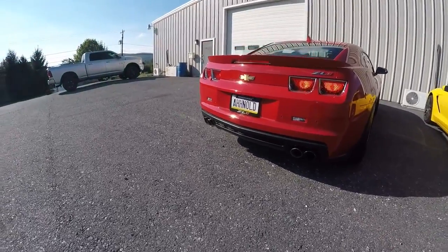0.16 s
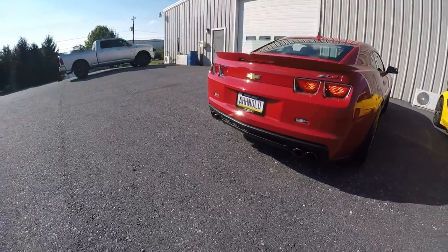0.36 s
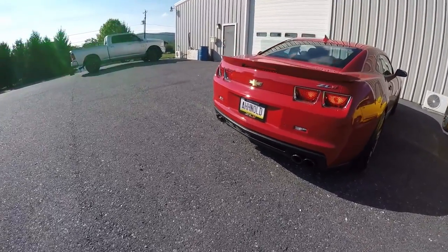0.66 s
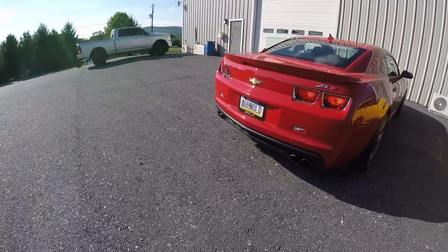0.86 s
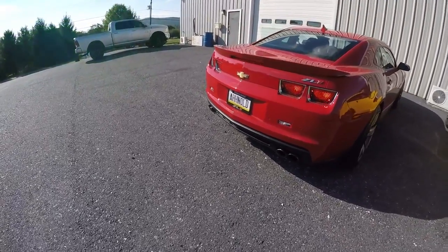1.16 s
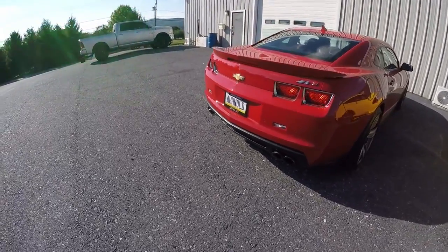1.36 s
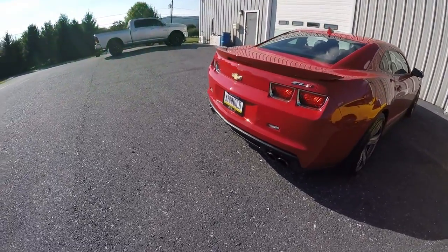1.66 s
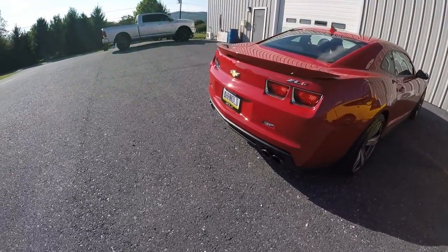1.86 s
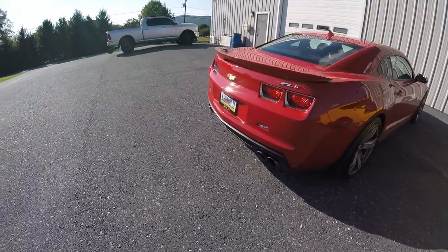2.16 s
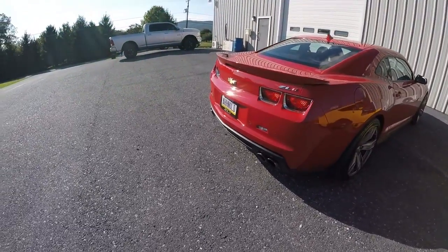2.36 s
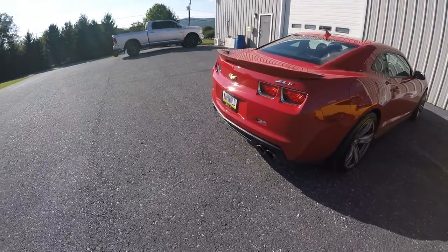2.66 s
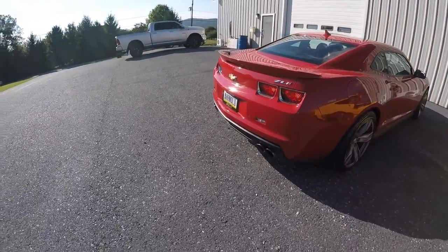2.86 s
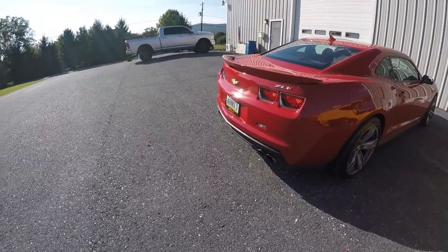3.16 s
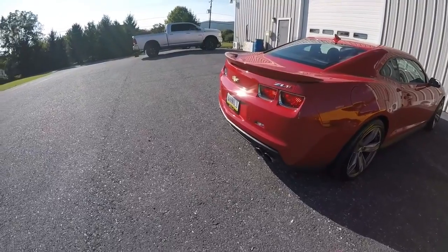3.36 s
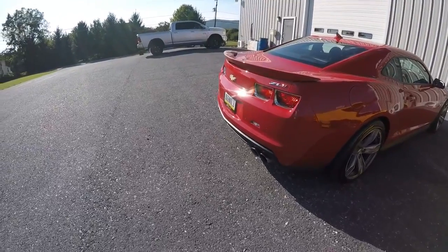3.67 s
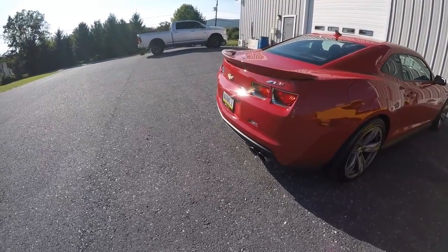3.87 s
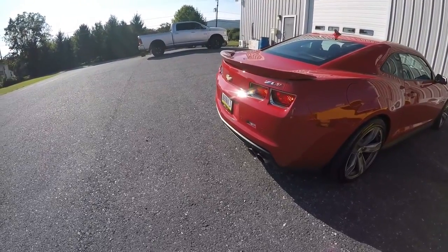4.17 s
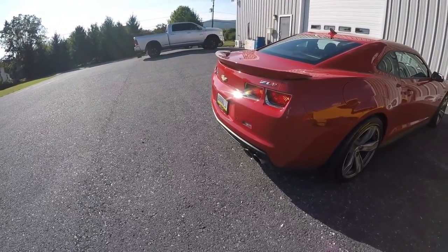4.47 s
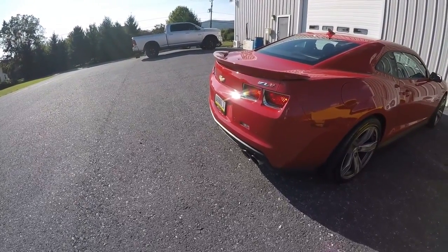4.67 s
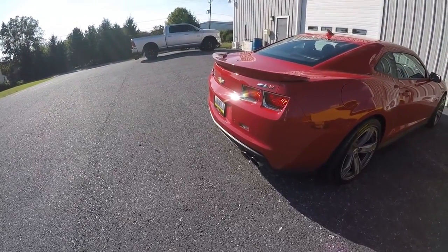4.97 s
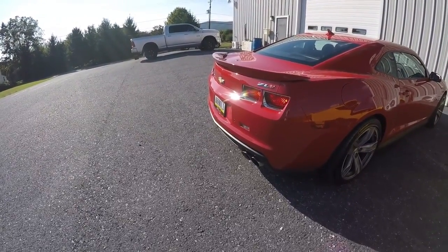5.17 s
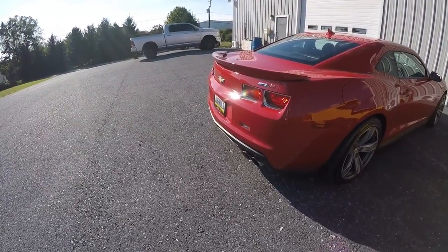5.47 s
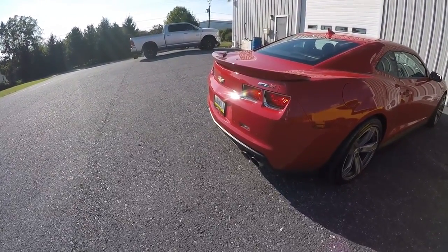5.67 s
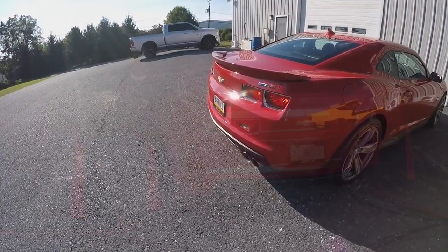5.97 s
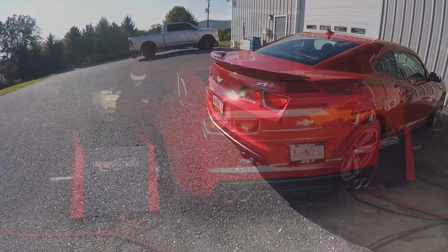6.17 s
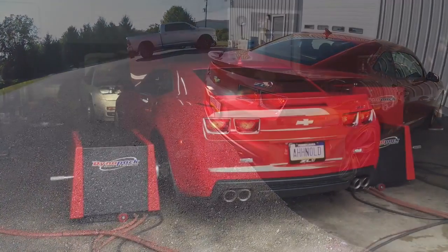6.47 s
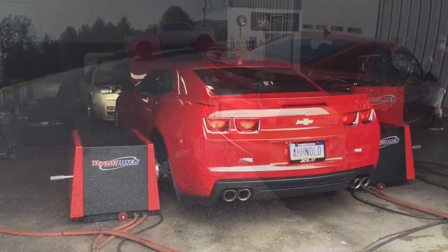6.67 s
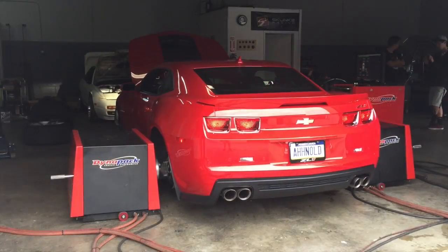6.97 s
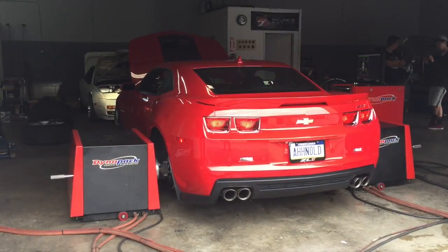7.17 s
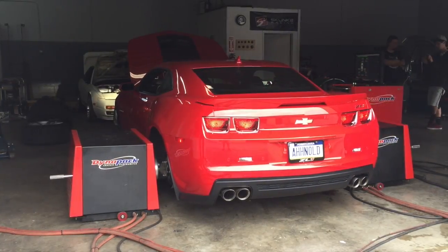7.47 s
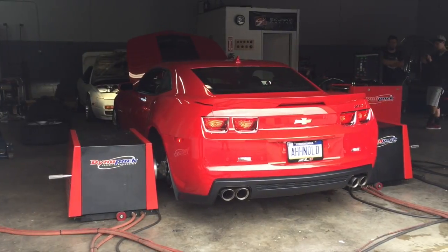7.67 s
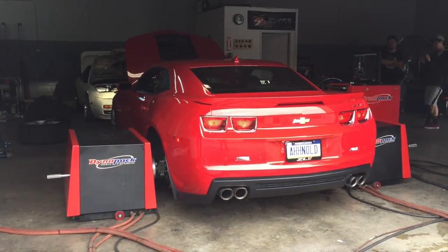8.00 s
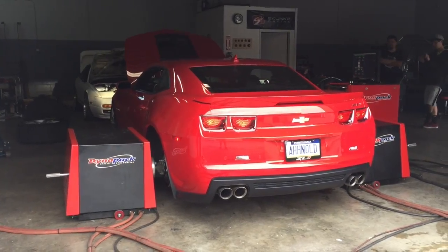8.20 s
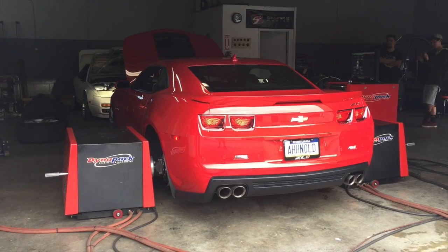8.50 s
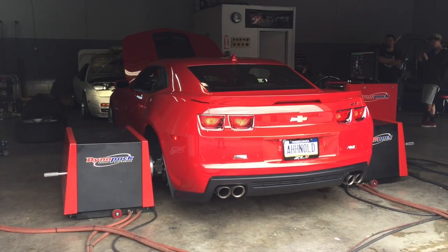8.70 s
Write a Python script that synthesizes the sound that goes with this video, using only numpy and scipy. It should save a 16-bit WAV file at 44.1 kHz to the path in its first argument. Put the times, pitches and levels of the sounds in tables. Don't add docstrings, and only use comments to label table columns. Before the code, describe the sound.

From 0 to 0.8 s a just-started cold V8 shakes outdoors, close to the microphone: sharp metallic ticks, heavy dull body knocks in the first quarter second, low yard rumble and a loping fast idle. The firing rate falls quickly until about 1.7 s, crossing hollow pipe notes, then eases by 3 s into a deep throb of roughly fifty pulses a second, with uneven silencer knocks. The exhaust is duller at first; from 1.2 to 3.4 s it grows louder and brighter as the listener walks behind the tailpipes, with gritty rasp and spitting, fizzing gas. It idles steadily until a crossfade at 6.1-6.8 s. In a resonant workshop, a thick low engine drone holds, begins climbing around 7 s, and rises faster after 8 s, swelling through booming resonances with pulsing roar and crackle. Pitch peaks near 8.7 s, then dips at the end.

```python
import sys
import numpy as np
from scipy import signal
from scipy.fft import rfft, irfft, next_fast_len
from scipy.io import wavfile
from scipy.ndimage import uniform_filter1d, map_coordinates

SR = 44100
rng = np.random.default_rng(int(sys.argv[2]) if len(sys.argv) > 2 else 0)


def transcribe(u):
    v = np.clip(np.atleast_2d(u).T, -1, 1)
    q = np.round(v * 32767).astype(np.int16)
    wavfile.write(sys.argv[1], SR, q)


def nominal_scale(level):
    x = np.asarray(level, float) / 20
    return 10 ** x


N = 389844
T = np.arange(N) / SR

# throb_db, throb_late_firings, spit_db
CYLINDERS = [(-1, 0.034, 0.5), (-1.5, -0.051, 0.5), (-0.5, -0.075, -5), (0, -0.067, 1.5),
             (-0.5, -0.005, -3), (1, 0.041, -2), (-4, -0.00025, 1.5), (1.5, -0.081, -2)]
FULL_BEAM_DB = -32


def unit(x):
    return x / np.sqrt(np.mean(x ** 2) + 1e-20)


def curves(rows):
    s, *cols = np.transpose(rows)
    return [np.interp(T, s, c) for c in cols]


def ramp(start_s, length_s):
    return np.clip((T - start_s) / length_s, 0, 1)


def wobble(rate_hz):
    return map_coordinates(rng.standard_normal(int(N * rate_hz / SR) + 4), [T * rate_hz])


def noise():
    return rng.standard_normal(N)


def filtered(x, response):
    m = next_fast_len(N + SR // 2)
    return irfft(rfft(x, m) * response(np.fft.rfftfreq(m, 1 / SR)), m)[:N]


def colour(points):
    f, db = np.transpose(points)
    return lambda hz: nominal_scale(np.interp(np.log(hz + 1), np.log(f + 1), db))


def resonant(modes):
    return lambda f: sum((-1) ** k * nominal_scale(db) * 1j * f * w / (c * c - f * f + 1j * f * w)
                         for k, (c, w, db) in enumerate(modes))


def lifted(modes, hz):
    return nominal_scale(sum(db / (1 + (2 * (hz - c) / w) ** 2) for c, w, db in modes))


def steep(hz, width_hz, db):
    return lambda f: nominal_scale(db) * resonant([(hz, 1.25 * width_hz, 0)])(f) ** 2


def idle():
    # start_s, firings_per_s
    idle_speed = [(0.0, 95.0), (0.6, 81.76), (0.85, 73.58), (1.1, 65.59), (1.4, 60.78), (1.7, 58.98),
                  (2.0, 57.43), (2.3, 53.78), (2.7, 52.96), (3.1, 51.69), (3.6, 51.79), (4.1, 51.8),
                  (4.6, 52.15), (5.05, 50.87), (5.4, 51.97), (5.8, 50.71), (6.1, 50.45), (6.6, 49.36)]
    # start_s, gas_spit_db
    beam_walk = [
        (0, -46),
        (.3, -50.5),
        (.95, -50.5),
        (1.25, -45.5),
        (1.5, -40.5),
        (2.3, -38.5),
        (2.9, -34.5),
        (3.4, -32),
        (6.3, -32.5),
    ]
    speed, = curves(idle_speed)
    spit_db, = curves(beam_walk)
    swing_db = spit_db - FULL_BEAM_DB
    full_knock_db, knock_follows, aside_knock_db = -24, 0.94, -36.5
    knock_db = 20 * np.log10(np.hypot(nominal_scale(full_knock_db + knock_follows * swing_db), nominal_scale(aside_knock_db)))
    rasp_db = -28.5 + 0.87 * swing_db

    first_firing = .235
    turns = first_firing + np.cumsum(speed) / SR
    firing = np.arange(int(turns[-1]) + 2)
    shared_db = 1.2 * rng.standard_normal(len(firing))
    blows = header_blows(turns, firing)

    engine = throb(speed, turns, firing) + cold_pipes(blows)
    engine += nominal_scale(knock_db) * silencer_knock(blows)
    engine += nominal_scale(rasp_db) * pipe_rasp(blows, turns, shared_db)
    engine += gas_spit(spit_db, turns, shared_db)
    return engine + yard(knock_db)


def throb(speed, turns, firing):
    boom_hz, boom_width_hz, boom_db = 55.65, 9.5, -11
    throb_db = boom_db - 10 * np.log10(1 + ((speed - boom_hz) / boom_width_hz) ** 2)
    size_db, late, _ = np.transpose(CYLINDERS)[:, firing % len(CYLINDERS)]
    size_db = size_db + 0.89 * rng.standard_normal(len(firing))
    late = late + 0.0085 * rng.standard_normal(len(firing))
    angle = 2 * np.pi * (turns - map_coordinates(late, [turns]))
    regular = unit(nominal_scale(map_coordinates(size_db, [turns])) * np.cos(angle))
    warm = ramp(.3, 0.69)

    lope_from_s, lope_to_s, rise_db_per_s, fall_db_per_s = 0.25, .82, 25, 52
    lope_db = -24 - rise_db_per_s * (lope_from_s - T).clip(0) - fall_db_per_s * (T - lope_to_s).clip(0)
    lope_hz = np.minimum(speed * 3 / 4, 62.9)
    lope = nominal_scale(lope_db + 2 * wobble(15)) * np.cos(2 * np.pi * np.cumsum(lope_hz) / SR + .8 * wobble(12))
    return filtered(warm * nominal_scale(throb_db) * regular + lope, lambda f: 1 / (1 + (41 / (f + 1)) ** 8))


def header_blows(turns, firing):
    headers = [(8.5, -18, -27, -8.5, 11, 2, 10.5, -26), (-51, -1, -15, -14.5, -4, -13, -12, -1.5),
               (1, -7, -24, -5.5, -8, -1, -9, -9), (-0.5, 2, 2.5, -14, -3.5, -5, -18, -5.5),
               (-39, 3, 6.5, -22, 2, -5, 6, -5.5)]
    scatter = 0.024 + 0.4 * np.exp(-firing / 32)
    moment = firing + 0.4064 + scatter * rng.standard_normal(len(firing))
    at = np.searchsorted(turns, moment).clip(0, N - 1)
    luck_db = 0.7 * rng.standard_normal((len(headers), len(firing)))
    blows = np.zeros((len(headers), N))
    blows[:, at] = nominal_scale(np.array(headers)[:, firing % len(CYLINDERS)] + luck_db)
    return blows


def silencer_knock(blows):
    # hz, width_hz, level_db
    silencer = [(73.8, 19.6, 6), (100.6, 23, 3), (144.2, 39, -7), (195.5, 30.4, -3.5), (251.3, 51.4, -8)]
    return unit(sum(filtered(unit(b) + 0.12 * noise(), steep(*m)) for b, m in zip(blows, silencer)))


def cold_pipes(blows):
    # hz, width_hz, level_db
    cold_notes = [(120, 19, 2), (166, 20, -2.5), (270, 12, -10)]
    ring = unit(sum(filtered(unit(b) + 0.17 * noise(), steep(*m)) for b, m in zip(blows, cold_notes)))
    centre_s, span_s = 1.14, 0.41
    return nominal_scale(-30.5) * np.exp(-((T - centre_s) / span_s) ** 2) * ring


def gas(turns, shared_db, depth, luck_db, fall_db, steady_db):
    count = len(shared_db)
    puff_db = np.transpose(CYLINDERS)[2][np.arange(count) % len(CYLINDERS)]
    strength_db = depth * (puff_db + shared_db) + luck_db * rng.standard_normal(count).clip(-2, 2)
    opened = turns - .15
    which, since = np.floor(opened).astype(int).clip(0), opened % 1
    puff = nominal_scale(strength_db[which] - fall_db * since) * (1 - np.exp(-(since / 0.24) ** 2))
    return (unit(puff) + nominal_scale(steady_db + 0.51 * wobble(18))) * nominal_scale(1.1 * wobble(6)) * noise()


def pipe_rasp(blows, turns, shared_db):
    # hz, width_hz, level_db
    pipe_modes = [(434, 22, -1), (463, 26, 1), (497, 24, -3), (529, 22, 1), (566, 30, -6), (612, 24, 0),
                  (650, 30, -5), (703, 46, -1), (795, 70, -5), (1130, 35, -9)]
    rasp = np.zeros(N)
    for k, mode in enumerate(pipe_modes):
        puffs = gas(turns, shared_db, depth=0, luck_db=3.5, fall_db=6.5, steady_db=-2.0)
        drive = 0.52 * unit(blows[k % len(blows)]) + puffs
        rasp += nominal_scale(2.0 * wobble(2.98)) * filtered(drive, steep(*mode))
    return unit(filtered(rasp, lambda f: (f / 400) ** 8 / (1 + (f / 400) ** 8) / (1 + (f / 1000) ** 4)))


def gas_spit(spit_db, turns, shared_db):
    # hz, level_db_per_hz
    jet_colour = [(500, -50), (850, -6), (1060, -6.5), (1640, -6), (1810, -6.5), (2360, -12.5),
                  (3040, -13.5), (4120, -6), (4540, -5.5), (9420, -14.5), (15500, -31)]
    # hz, width_hz, level_db
    tip_modes = [(1340, 110, 0), (1660, 110, -1), (2200, 120, -3), (2400, 170, 1), (2670, 110, -4),
                 (3010, 260, 2), (3420, 170, 0), (4500, 200, -4)]
    tip_beam = [0.019, 0.058, 0.28, 0.36, .2, 0.24, 0.069, 0.093]
    swing_db = spit_db - FULL_BEAM_DB
    tint = colour(jet_colour)

    def upper(f):
        return 1 / (1 + (4300 / (f + 1)) ** 6)

    def jet(hz):
        return lambda f: tint(f) * upper(f) * np.exp(-(np.log((f + 1) / hz) / .085) ** 2)

    puffs = gas(turns, shared_db, depth=0.77, luck_db=3.5, fall_db=9, steady_db=1.0)
    spit = unit(filtered(puffs, lambda f: tint(f) * (1 - upper(f))))
    fizz, flecks = np.zeros(N), np.zeros(N)
    for hz in 4700 * 1.135 ** np.arange(10):
        fizz += filtered(gas(turns, shared_db, depth=2.06, luck_db=4.0, fall_db=25.5, steady_db=-4), jet(hz))
    for tip, extra in zip(tip_modes, tip_beam):
        puffs = gas(turns, shared_db, depth=1.1, luck_db=5.5, fall_db=20.5, steady_db=-3)
        flecks += nominal_scale(extra * swing_db) * filtered(puffs, steep(*tip))
    fizz_db = spit_db - 4 + .35 * swing_db
    return nominal_scale(spit_db - 5.5) * spit + nominal_scale(spit_db - 1.8) * unit(flecks) + nominal_scale(fizz_db) * unit(fizz)


def pull():
    # start_s, engine_cycles_per_s
    pull_speed = [
        (6.3, 18.31),
        (6.9, 18.31),
        (7.3, 18.89),
        (7.75, 20.2),
        (8.15, 21.43),
        (8.45, 23.1),
        (8.66, 24.59),
        (8.84, 22.56),
    ]
    # multiple_of_cycle, level_db
    crank_orders = [(1, -56), (2, -50), (3, -20), (4, -18.5), (5, -15.5), (6, -23), (7, -23.5), (8, -13.5),
                    (9, -24), (10, -14.5), (11, -10.5), (12, -25.5), (13, -23.5), (14, -19), (15, -19.5),
                    (16, -7.5), (17, -18.5), (18, -18.5), (19, -15), (20, -22), (21, -30), (22, -23.5),
                    (23, -28), (24, -20.5), (25, -35), (26, -22), (27, -24.5), (28, -22.5)]
    # hz, width_hz, lift_db
    hall_modes = [(111, 16, 8.5), (147.05, 8.4, 9), (154.5, 13.2, 12), (170, 25.5, 12), (195.0, 6.9, -2),
                  (231.4, 31, 8), (281, 16.3, 13.5), (316.6, 25, -10), (355, 49, 6), (420, 25, -9.5),
                  (552, 30, 7.9), (650, 20.7, 5.8), (990, 90, 5)]
    cycle_hz, = curves(pull_speed)
    load_from_s, load_to_s = 7.35, 8.82
    load = np.sin(np.pi / 2 * ramp(load_from_s, load_to_s - load_from_s)) ** 2
    angle = 2 * np.pi * np.cumsum(cycle_hz) / SR

    top_order, brighten_db_per_order = 48, .16
    above = np.arange(top_order - len(crank_orders))
    upper_db = -30 - .55 * above + 3 * rng.standard_normal(len(above))
    upper_orders = zip(len(crank_orders) + 1 + above, upper_db)
    tones, on = np.zeros(N), slice(6 * SR, N)
    for k, db in [*crank_orders, *upper_orders]:
        sway_db = (.5 + k / 16) * wobble(8)[on]
        phase = rng.uniform(0, 2 * np.pi) + (.08 + k / 120) * wobble(11)[on]
        tone = np.sin(round(k) * angle[on] + phase)
        tone_db = db + brighten_db_per_order * load[on] * (k - 14)
        tones[on] += tone * nominal_scale(sway_db + tone_db) * lifted(hall_modes, round(k) * cycle_hz[on])
    return nominal_scale(-23.5 + 2.5 * load) * tones + roar(angle, load)


def roar(angle, load):
    # hz, level_db_per_hz
    roar_colour = [(11, -66), (18, -37), (164, -4), (258, -11.5), (362, -6), (417, -18.5), (538, -14),
                   (1120, -34), (1490, -31), (3030, -39.5), (4140, -37.5), (4900, -40.5), (15600, -56)]
    # hz, width_hz, lift_db
    roar_peaks = [(930, 150, 5), (1530, 130, 7), (1730, 130, 6), (2600, 150, 9), (2780, 140, 5),
                  (3570, 250, 4), (4170, 280, 7)]
    tint = colour(roar_colour)
    beat = 1 + 0.086 * np.cos(8 * angle) + 0.17 * np.cos(3 * angle)
    fired = np.flatnonzero(np.diff(np.floor(8 * angle / (2 * np.pi))))
    crack_db = np.transpose(CYLINDERS)[2][np.arange(len(fired)) % len(CYLINDERS)]
    cracks = np.zeros(N)
    cracks[fired] = nominal_scale(crack_db + 3.1 * rng.standard_normal(len(fired)))
    cracks = filtered(unit(cracks), lambda f: 1 / (1 + (f / 3500) ** 2))

    rush = 0.36 * cracks + beat * noise() * nominal_scale(0.71 * wobble(30))
    high = unit(filtered(rush, lambda f: tint(f) * lifted(roar_peaks, f) / (1 + (700 / (f + 1)) ** 4)))
    flutter = unit(sum(nominal_scale(5.5 * wobble(14)) * filtered(cracks + beat * noise(), steep(hz, width_hz, 0))
                       for hz, width_hz, _ in roar_peaks))
    high = unit(high + 0.29 * flutter)
    low = unit(filtered(noise(), lambda f: tint(f) / (1 + (f / 700) ** 4)))
    return nominal_scale(-38 + 8 * load) * high + nominal_scale(-39.5 + 10 * load) * low


def rattles():
    # start_s, peak_db, ring_hz
    loose_parts = [(0.0285, -32, 2970), (0.0785, -24.5, 2900), (0.128, -28, 2760), (0.2045, -30, 2900),
                   (0.329, -29, 2770), (0.409, -24, 3530), (0.4443, -34, 2780), (0.513, -34, 4400),
                   (0.578, -34.5, 2770), (0.6913, -43, 3220), (0.7432, -47, 3140), (0.8121, -42, 2760)]
    # hz, width_hz, lift_db
    heat_shield = [(1620, 300, 7), (2270, 450, -8), (2900, 300, 3.5), (3500, 250, 3), (4000, 250, -2),
                   (4600, 450, 4)]
    # start_s, level_db
    body_knocks = [
        (.005, 19.5),
        (.078, 26),
        (.104, 18),
        (.122, 8),
        (.15, 8),
        (.24, 15),
        (.262, 16.5),
        (.41, 1),
    ]
    # hz, width_hz, level_db
    panel_modes = [(111, 16, 7.5), (160, 29, 2.5), (274, 8.7, 2.5), (466, 21, 0.5), (499, 26, 0.5),
                   (720, 190, -14), (1650, 200, -27), (1940, 81, -23)]
    ticks, knocks, t = np.zeros(N + SR), np.zeros(N), np.arange(SR // 8) / SR
    for s, db, hz in loose_parts:
        shake = rng.standard_normal((2, len(t)))
        ring = 0.28 * np.sin(2 * np.pi * hz * t + .055 * np.cumsum(shake[0])) * nominal_scale(-60 * t / 0.051)
        crack = .45 * shake[1] * nominal_scale(-60 * t / 0.11)
        ticks[round(s * SR):][:len(t)] += nominal_scale(db + 3) * (ring + crack) * (1 - np.exp(-t / 0.00085))
    for s, db in body_knocks:
        knocks[round(s * SR)] = nominal_scale(db)
    band = lambda f: (f / 900) / (1 + f / 900) / (1 + (f / 5500) ** 4)
    ticks = filtered(ticks[:N], lambda f: lifted(heat_shield, f) * band(f))
    return ticks + filtered(knocks, resonant(panel_modes))


def yard(knock_db):
    # hz, level_db_per_hz
    yard_colour = [(8, -17), (25, 10), (60, -3), (120, 11), (165, 8.5), (230, -2.5), (385, -14),
                   (460, -7.5), (800, -20), (1100, -26), (2200, -50)]
    rumble_db = knock_db - 10.0 + 15.4 * np.exp(-(T / 2.0) ** 2)
    return nominal_scale(rumble_db) * unit(filtered(noise(), colour(yard_colour)))


def drop_faint_treble(x):
    quiet_db, scatter_db, rise_db_per_khz4 = -128.5, 5.5, .001
    hz, _, z = signal.stft(x, SR, nperseg=1024)
    near = uniform_filter1d(abs(z) ** 2, size=5, axis=0)
    ragged = unit(uniform_filter1d(rng.standard_normal(z.shape), size=4, axis=0))
    threshold_db = quiet_db + scatter_db * ragged + rise_db_per_khz4 * (hz[:, None] / 1000) ** 4
    heard = near > nominal_scale(2 * threshold_db)
    return signal.istft(z * heard, SR, nperseg=1024)[1][:N]


def scene():
    yard_out_s, hall_in_s, fade_s = 6.148, 6.12, 0.7
    outdoors = (1 - ramp(yard_out_s, fade_s)) * idle() + rattles()
    workshop = ramp(hall_in_s, fade_s) * pull()
    return (drop_faint_treble(outdoors) + workshop)[None]


def roll_off(x):
    return signal.sosfilt(signal.butter(12, 15800, fs=SR, output="sos"), x)


def record(dry):
    ceiling, top_hz = .62, 15700
    held = dry[0] / (1 + abs(dry[0] / ceiling) ** 8) ** (1 / 8)
    mix = filtered(held, lambda f: np.clip((top_hz - f) / 150 + 1, 0, 1))[None]
    return roll_off(mix)


dry = scene()
out = record(dry)
transcribe(out)
```